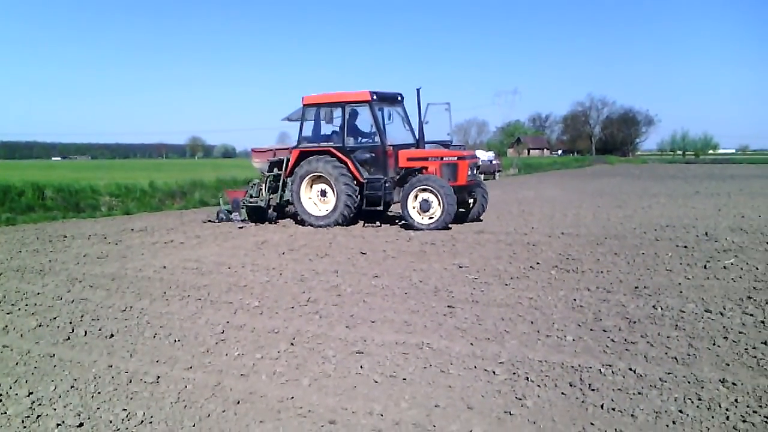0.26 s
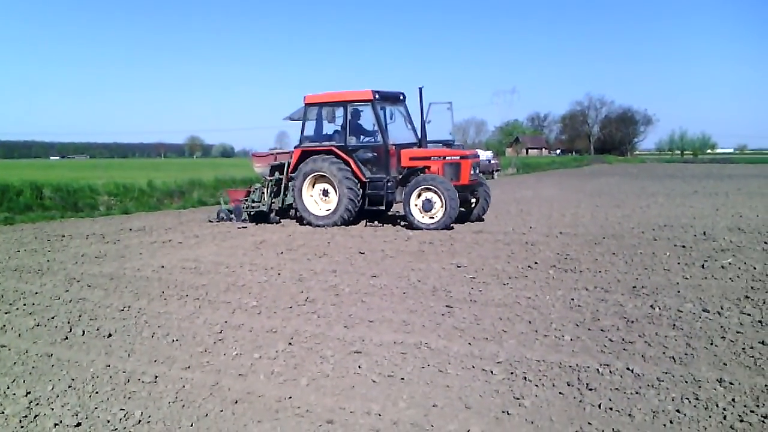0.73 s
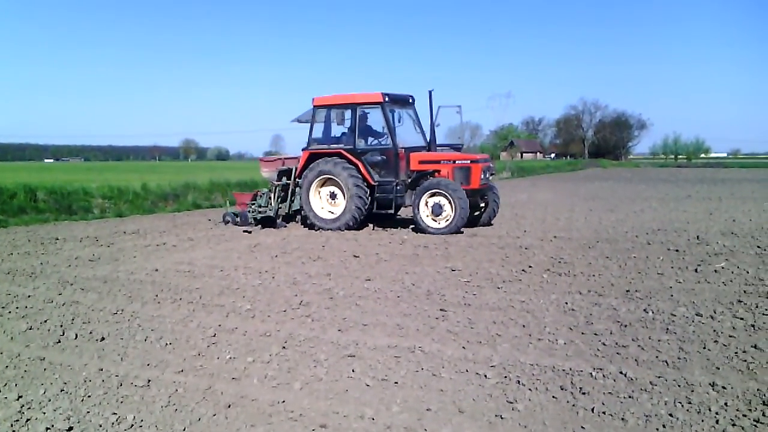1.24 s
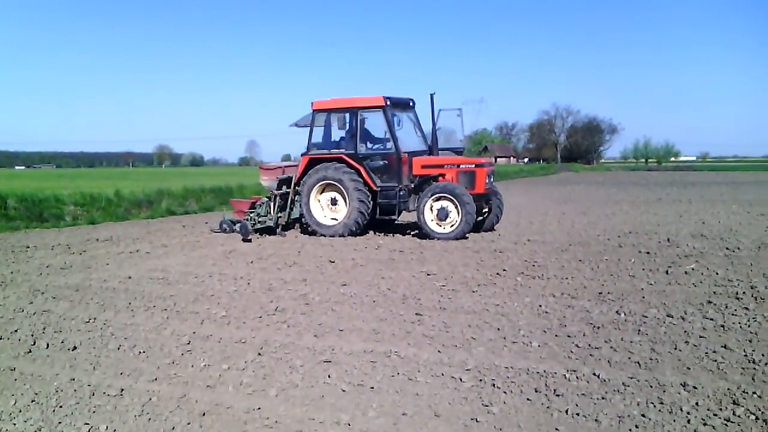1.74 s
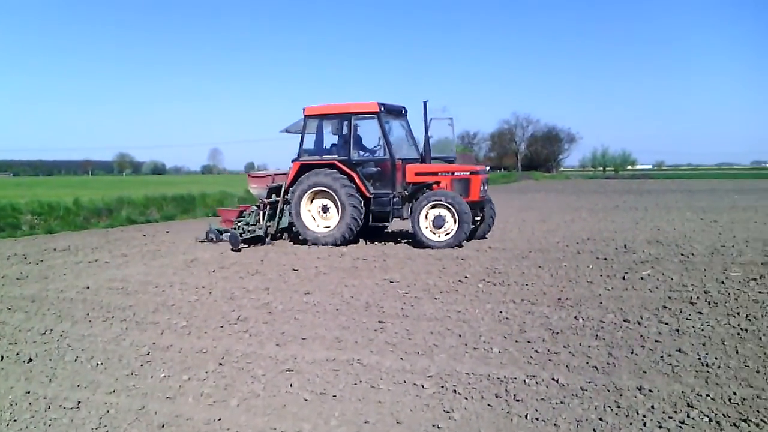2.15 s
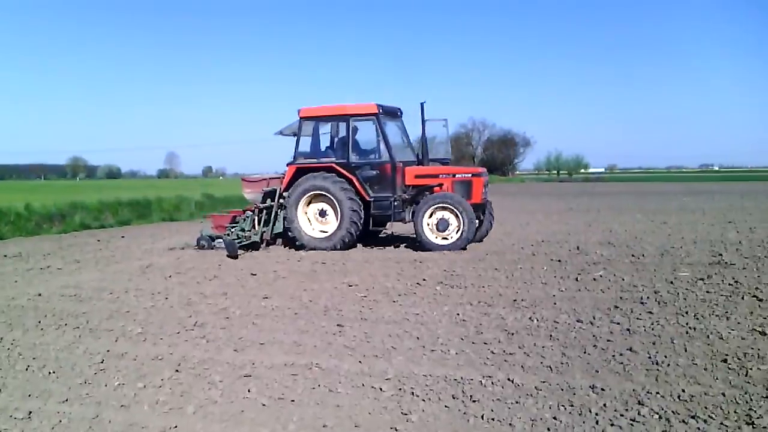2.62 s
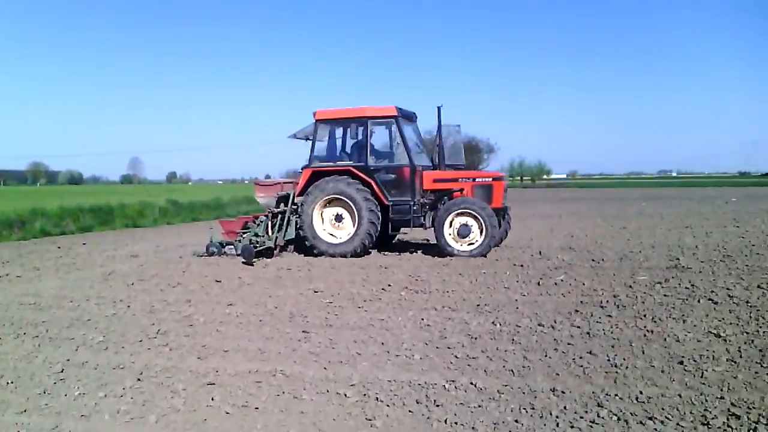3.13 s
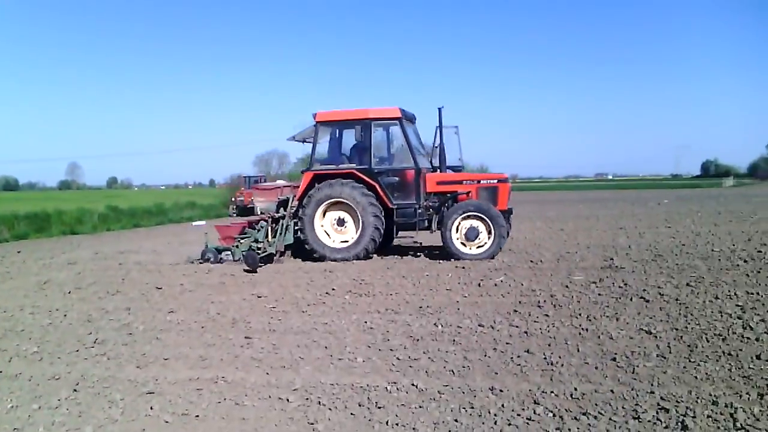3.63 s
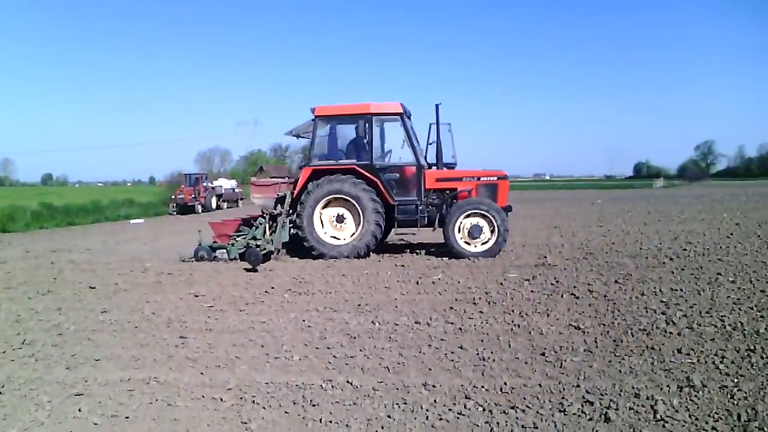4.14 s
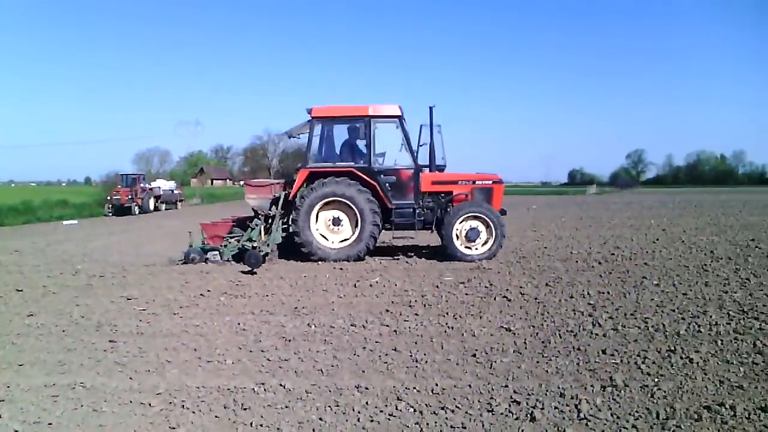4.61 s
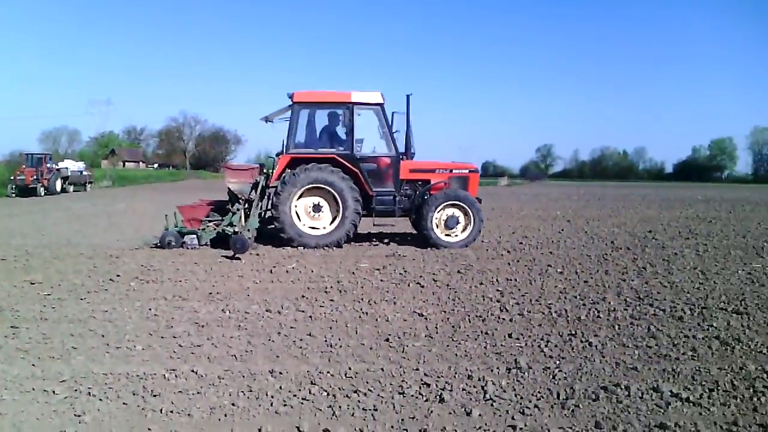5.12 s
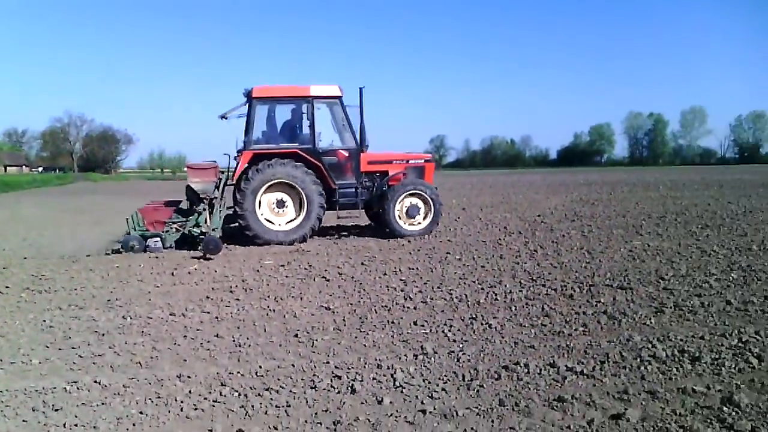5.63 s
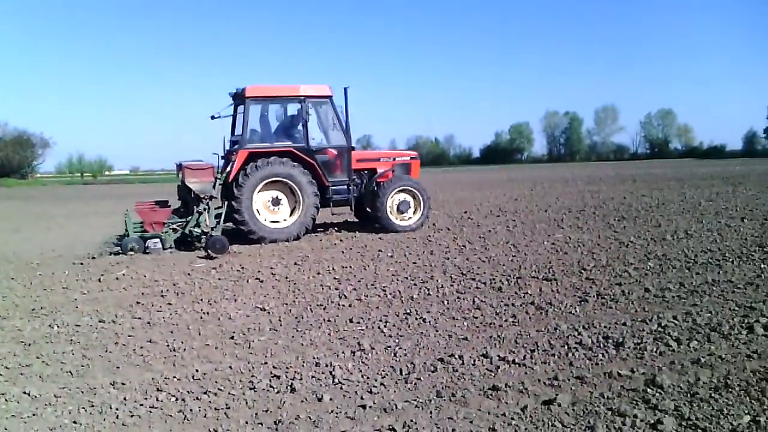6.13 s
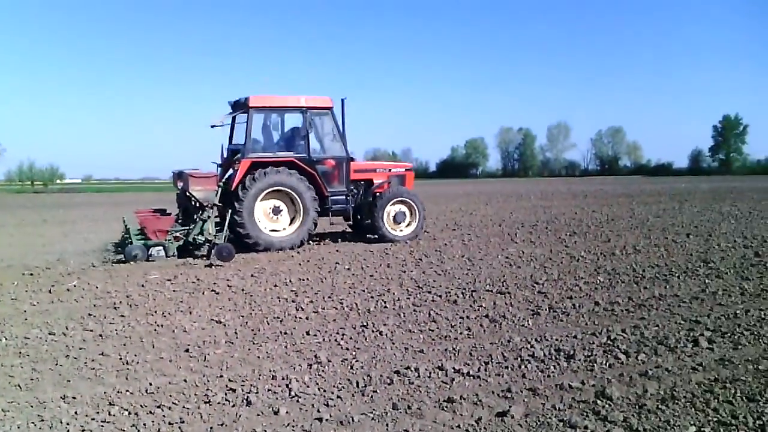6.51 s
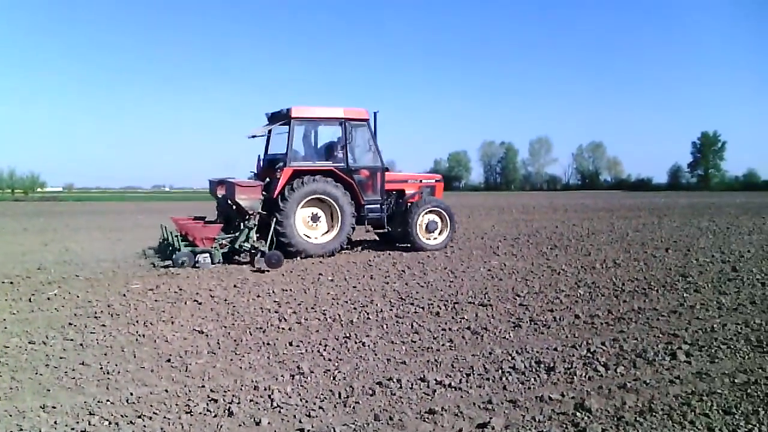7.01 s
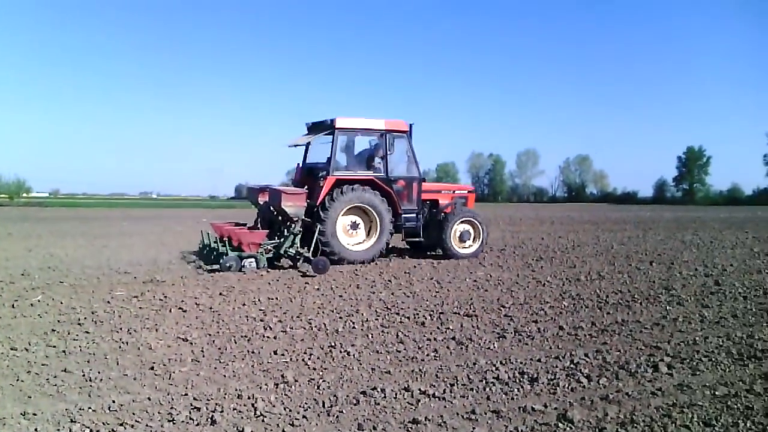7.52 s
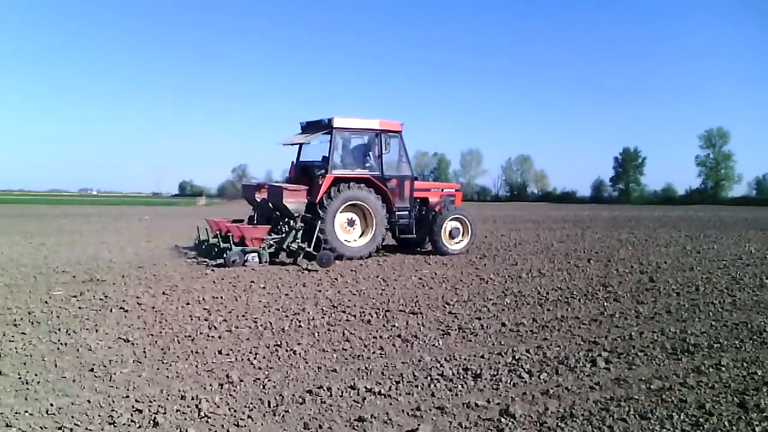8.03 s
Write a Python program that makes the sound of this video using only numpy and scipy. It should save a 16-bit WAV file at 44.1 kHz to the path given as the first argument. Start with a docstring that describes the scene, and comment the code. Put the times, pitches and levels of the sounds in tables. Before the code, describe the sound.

A diesel tractor clatters past in an open field, sagging then revving up, while its towed planter squeaks, scrapes and clinks over dry clods.

```python
"""Tractor pulling a planter

A four-cylinder diesel tractor passes in an open field; its engine sags, then picks up speed.
The engine is tones at multiples of its firing rate, plus noise that swells at each firing.
Early on, while it runs slowly, a loose part buzzes and chirps at the pace of the firings.
The planter's steel scrapes, squeaks and clinks over clods, as ringing modes; a disc rubs once a turn.
Short dry cracks rattle, the frame clunks, a thin whine glides, and there is one low thump."""
import sys
import numpy as np
from scipy import signal
from scipy.fft import rfft, irfft
from scipy.io import wavfile
from scipy.ndimage import uniform_filter1d, map_coordinates

SR = 44100
rng = np.random.default_rng(int(sys.argv[2]) if len(sys.argv) > 2 else 0)


def wav_out(sig):
    """Save sig, one row per channel (or a flat mono array), as 16-bit PCM at SR to the path in sys.argv[1]."""
    wavfile.write(sys.argv[1], SR, np.round(np.clip(np.atleast_2d(sig).T, -1, 1) * 32767).astype(np.int16))


N = 364266
TIME = np.arange(N) / SR


# the engine: (time [s], firing rate [Hz], level of the note at twice that rate [dB])
ENGINE = [(0.0, 39.2, -55.5), (0.27, 38.46, -57.5), (0.62, 39.73, -55), (0.9, 37.66, -56),
          (1.29, 33.45, -52), (1.59, 32.64, -58), (1.82, 33.02, -55), (2.05, 34.84, -54.5),
          (2.53, 41.47, -50), (2.76, 46.2, -41.5), (2.85, 46.56, -48.5), (3.47, 48.6, -49.5),
          (3.73, 49.6, -47.5), (3.91, 49.18, -48.5), (4.55, 51.57, -48), (5.47, 50.58, -48.5),
          (5.73, 51.63, -49), (5.86, 50.48, -50), (6.88, 47.1, -56), (7.45, 47.72, -54.5),
          (8.17, 50.12, -50), (8.26, 51.8, -48)]
# wavering tones of the uneven cylinders: (multiple of the firing rate, relative level [dB])
UNEVEN_ORDERS = [(1.5, -12), (1.75, -8), (2.25, -5), (2.5, -7), (2.75, -7.5), (3.25, -7), (3.5, -8),
                 (3.75, -3), (4.25, -9), (4.5, -4.5), (4.75, -6), (5.5, -20), (5.75, -18.5), (6.5, -17.5)]
# steadier tones at whole multiples: (multiple of the firing rate, relative level [dB])
WHOLE_ORDERS = [(4, -2), (5, -4), (6, -11), (7, -13), (8, -18), (9, -20), (10, -23)]
# how the pipe's tones grow; the columns of every such law are listed above strength()
PIPE_LAW = (-56, 3, 0.03, -2, 1.5)


def exhaust(firings, first_db=-11, first_rear_db=8, uneven_db=-2.0, uneven_speed_db=11,
            whole_db=-1.0, whole_speed_db=-3):
    """Tones at multiples of the firing rate; uneven cylinders add in-between ones that grow with speed."""
    def tone(order, waver):
        turning = np.exp(2j * np.pi * (order * firings + rng.random()))
        return unit(((1 + waver * wander(N, 12.4)) * turning).real)

    def lift_db(order, pipe_hz=170, width_hz=11.7, peak_db=2):
        # the exhaust pipe lifts a tone that passes through its resonance
        return peak_db / (1 + ((order * curve(ENGINE) - pipe_hz) / width_hz) ** 2)

    note = amp(curve(ENGINE, axis=2))
    pipe = strength(PIPE_LAW)
    doublings = np.log2(curve(ENGINE) / WORKING_HZ)
    # the lowest tone grows as the tractor turns its rear to the listener
    drone = note * amp(first_db + first_rear_db * view()[1]) * tone(order=1, waver=.15)
    drone += note * tone(order=2, waver=0.18) + pipe * tone(order=3, waver=1 / 3)
    whole = sum(amp(db + lift_db(order)) * tone(order, .25) for order, db in WHOLE_ORDERS)
    uneven = sum(amp(db) * tone(order, .5) for order, db in UNEVEN_ORDERS)
    whole_gain = amp(whole_db + whole_speed_db * doublings)
    uneven_gain = amp(uneven_db + uneven_speed_db * doublings)
    return drone + pipe * (whole_gain * whole + uneven_gain * uneven)


# noise colours, before their laws: (frequency [Hz], left density [dB per Hz], right density [dB per Hz])
RUMBLE = [(12, -97, -97), (30, -95, -95), (59.6, -84, -92), (120, -82.5, -79.5), (198, -73, -74.5),
          (256, -79, -74.5), (317, -82, -84.5), (430, -88, -86), (606, -105, -105)]
CLATTER = [(405, -105, -105), (498, -91, -89.5), (580, -80, -81), (760, -80, -79), (1210, -80.5, -80.5),
           (1430, -90.5, -82.5), (1570, -80.5, -80.5), (2110, -88, -82), (2940, -87.5, -99.5),
           (2900, -88, -85.5), (3900, -110, -110)]
HISS = [(2870, -112, -112), (3575, -86.5, -85), (4670, -92.5, -83.5), (5220, -100, -79.5),
        (6070, -88.5, -88.5), (7220, -77, -85.5), (7430, -74, -85), (8050, -75.5, -101), (9320, -88, -112),
        (10750, -102, -121), (10550, -115, -121), (13400, -115, -115), (15400, -124, -130)]
FIZZ = [(10900, -111, -115), (13000, -110, -109), (15200, -119, -126)]
# how each noise grows: columns as listed above strength()
RUMBLE_LAW = (0.18, 1.8, 0.053, 3.3, 2.34)
CLATTER_LAW = (0.12, 0.75, 0.063, 0.88, 1.6)
HISS_LAW = (0.14, 7.6, 0.07, 3.75, 0.067)
FIZZ_LAW = (3, 13, -0.12, -10, 1.5)


def engine_noise(firings, waver_db=0.68):
    """Exhaust rumble, combustion clatter, hiss and a fizz from the front, beating with the firings."""
    def level(law):
        return strength(law) * amp(waver_db * wander(N, 0.73).real)
    rumble = noise(RUMBLE) * level(RUMBLE_LAW)
    rumble *= puffs(firings, depth=0.78, decay=0.29, uneven=0.58, delay=0.067)
    clatter = noise(CLATTER) * level(CLATTER_LAW)
    clatter *= puffs(firings, depth=0.81, decay=0.79, uneven=0.31, delay=0.312)
    hiss = noise(HISS) * level(HISS_LAW) + noise(FIZZ) * level(FIZZ_LAW)
    hiss *= puffs(firings, depth=0.46, decay=0.62, uneven=0.6, delay=0.25)
    return rumble + clatter + hiss


def puffs(firings, depth, decay, uneven, delay):
    """A burst of gain at each firing; the four cylinders differ, and chance varies every burst."""
    count = np.floor(firings + delay).astype(int)
    phase = (firings + delay) % 1
    swing = np.array([-0.12, 0.095, 0.0039, 0.25])[count % 4] + rng.standard_normal(512)[count]
    size = 1 + uneven * np.tanh(swing)
    burst = unit(size * (1 - np.exp(-phase / 0.096)) * np.exp(-phase / decay))
    return np.sqrt(1 - depth + depth * burst ** 2)


# an engine law: (level at working speed [dB], growth per doubling of speed [dB],
#   growth per acceleration [dB per Hz/s], extra from behind [dB], share of the distance loss)
WORKING_HZ = 50  # firing rate at working speed


def strength(law):
    """Gain of an engine sound from its speed, its acceleration and the tractor's place."""
    db, speed_db, pull_db, rear_db, loss_share = law
    hz = curve(ENGINE)
    loss_db, rear = view()
    pull = uniform_filter1d(np.gradient(hz) * SR, size=SR // 4)
    level_db = db + speed_db * np.log2(hz / WORKING_HZ) + pull_db * pull
    return amp(level_db + rear_db * rear + loss_share * loss_db)


def view(nearest_s=5.26, distance_m=9.8, speed_m_per_s=2.07):
    """Straight drive past: level change with distance [dB], and the side seen, -1 front to 1 rear."""
    along = speed_m_per_s * (TIME - nearest_s)
    distance = np.hypot(along, distance_m)
    return 20 * np.log10(distance_m / distance), along / distance


def passing(sound):
    """Extra path to the right ear delays it, by half a sample at first and four samples at the end."""
    at = np.arange(N) - np.linspace(.5, 4, N)
    return np.array([sound[0], map_coordinates(sound[1], [at], order=3, mode="nearest")])


# runs of chirps at the firing pace: (time [s], length [s], relative level [dB])
CHIRP_RUNS = [(0.036, 0.06, -31.5), (0.114, 0.06, -29.5), (0.192, 0.09, -31), (0.321, 0.064, -32),
              (0.448, 0.038, -32.5), (0.526, 0.02, -38), (0.55, 0.038, -33), (0.676, 0.02, -34)]
# harder kicks: (time [s], then relative level [dB] of the low mode, main mode and high mode)
RATTLES = [(0.628, -28, -43, -38.5), (0.652, -38, -34, -46), (0.705, -40, -40, -36), (0.731, -38, -48, -38),
           (0.755, -38, -44, -48), (0.78, -37, -39, -55)]


def chirps(main_hz=6600, low_hz=5000, high_hz=8100, rise_s=0.0028, hold_s=0.0034, decay_s=0.0054,
           scatter_db=0.7, scatter_hz=70):
    """A kicked loose part rings for a few milliseconds; hard kicks also wake its outer modes."""
    out, t = np.zeros((2, N)), np.arange(2048) / SR
    shape = np.sin(np.pi / 2 * np.minimum(t / rise_s, 1)) * np.exp(-np.maximum(t - hold_s, 0) / decay_s)
    rate = curve(ENGINE)[TIME < CHIRP_RUNS[-1][0]].mean()  # average firing rate over the runs
    for start, length, db in CHIRP_RUNS:
        for s in np.arange(start, start + length, 1 / rate):
            loud, pitch = rng.standard_normal(2)
            main = ring(len(t), main_hz + scatter_hz * pitch, 260, 1.1, steadiness=0.39, glide=-0.059)
            add(out, s, amp(db - 6 + scatter_db * loud) * shape * main)
    for s, low_db, main_db, high_db in RATTLES:
        low = amp(low_db) * ring(len(t), low_hz, 260, -16, steadiness=1.0, glide=-0.027)
        main = amp(main_db) * ring(len(t), main_hz, 530, 1.2, steadiness=1.0, glide=-0.025)
        high = amp(high_db) * ring(len(t), high_hz, 130, 14, steadiness=0.89)
        add(out, s, shape * (low + main + high))
    return out


# the loose part buzzing on its seat: (time [s], relative level [dB])
BUZZ = [(0, -87), (0.14, -52), (0.3, -65), (0.45, -56), (0.58, -58.5), (0.65, -50), (0.8, -61), (0.9, -65),
        (1.05, -85), (1.3, -120)]
# resonances of the seat: (frequency [Hz], width [Hz], relative level [dB], left minus right [dB])
SEAT = [(3450, 180, -15, -14), (4270, 240, -1, -11), (5050, 230, -5.5, -15), (5700, 150, -0.5, -21)]


def buzz(firings):
    """The loose part also chatters roughly on its seat, in time with the firings."""
    rough = bank(SEAT, BUZZ, apart=0.86, steadiness=0.24) * flutter(N, 30, depth=0.95)
    return rough * puffs(firings, depth=0.87, decay=0.83, uneven=0.6, delay=0.33)


# sharp knocks of steel on steel: (time [s], length [s], attack [s], body level [dB],
#   top modes against the body [dB], squeak level [dB], squeak pitch [Hz],
#   slipping joint level [dB], joint pitch [Hz], crack level [dB]); levels are relative
KNOCKS = [(1.676, 0.015, 0.0054, -62, 7, -44, 5450, -34, 3820, -43.5),
          (3.593, 0.035, 0.012, -63, 11, -29.5, 5560, -69, 4600, -54),
          (3.739, 0.045, 0.014, -45, -25, -24, 5560, -38.5, 4004, -65),
          (3.94, 0.032, 0.01, -58, 14, -28, 5560, -67, 4074, -55),
          (4.246, 0.034, 0.005, -36.5, -5, -23, 5500, -35.5, 3920, -54),
          (4.482, 0.033, 0.0097, -46, -1, -31, 5440, -43, 3900, -61),
          (4.544, 0.037, 0.0067, -54, 5, -32, 5510, -62, 4500, -65),
          (4.969, 0.039, 0.011, -37.5, -4, -26, 5550, -45, 4000, -52),
          (5.967, 0.053, 0.0041, -45, 11, -37, 5530, -69, 4270, -48),
          (6.492, 0.044, 0.011, -45, -14, -39.5, 5540, -56, 4400, -47),
          (6.673, 0.05, 0.022, -44, 1.5, -33.5, 5540, -60, 3970, -56),
          (6.835, 0.043, 0.0044, -45, -9, -40, 5550, -73, 4360, -59),
          (7.203, 0.041, 0.0069, -31, -20, -52, 5550, -51, 4534, -53),
          (8.177, 0.048, 0.0068, -38, -18, -39, 5380, -44.5, 4500, -57.5)]
# broad bands of the crack: (frequency [Hz], width [Hz], relative level [dB], left minus right [dB])
CRACK = [(2090, 210, -6, -14), (3220, 330, -5, -7), (4900, 650, 0, -17), (7630, 1300, -0.5, 10)]


def knocks(crack_s=0.022, crack_attack_s=0.003, clang_hz=5380, clang_db=-10):
    """The frame jolts over clods: a short broad crack and ringing steel, strengthened by an added clang."""
    out = np.zeros((2, N))
    for (s, length, attack, body_db, bright_db, squeak_db, squeak_hz,
         joint_db, joint_hz, crack_db) in KNOCKS:
        rise = attack / length
        add(out, s, contact(length, rise, body_db, body_db + bright_db, squeak_db,
                            joint_db, joint_hz, squeak_hz))
        shape = stroke(length, rise, fall=2.5, roundness=2)
        clang = ring(len(shape), clang_hz, 30, -19, steadiness=0.73)
        add(out, s, amp(squeak_db + clang_db) * shape * clang)
        shape = stroke(crack_s, crack_attack_s / crack_s, fall=0.88)
        add(out, s, amp(crack_db) * shape * modes(len(shape), CRACK, steadiness=.1, apart=1.4))
    return out


# softer rubs: (time [s], length [s], body level [dB], top modes level [dB], squeak level [dB],
#   slipping joint level [dB], joint pitch [Hz]); levels are relative
RUBS = [(1.975, 0.073, -69, -60, -46.5, -68, 4040), (3.686, 0.077, -70, -57, -37, -72, 4000),
        (3.777, 0.023, -42.5, -57, -30.5, -57, 4000), (3.85, 0.056, -47, -44, -31, -45, 4480),
        (3.98, 0.042, -60, -56, -39, -56, 3840), (4.015, 0.071, -53, -59, -38, -63, 3847),
        (4.107, 0.04, -57, -52, -31.5, -56, 4480), (4.15, 0.041, -66, -62, -43.5, -70, 3973),
        (4.287, 0.04, -49, -55, -42, -64, 3900), (4.367, 0.051, -40.5, -52, -38, -47, 4000),
        (4.448, 0.055, -50, -44, -38, -65, 4037), (4.616, 0.059, -57, -48, -34, -53, 4460),
        (4.712, 0.043, -50, -53, -47, -56, 4455), (4.791, 0.035, -53, -45, -47.5, -59, 4350),
        (5.068, 0.049, -37.5, -60, -44, -51, 3970), (5.287, 0.044, -45.5, -47, -64, -64, 4400),
        (5.448, 0.069, -68, -48, -37.5, -70, 4423), (5.553, 0.041, -58, -48, -60, -55, 4407),
        (5.731, 0.041, -38.5, -49, -45, -61, 4354), (5.799, 0.044, -58, -44, -62, -52, 4440),
        (5.994, 0.061, -37, -41.5, -48, -47, 4330), (6.061, 0.038, -47, -42.5, -55, -55, 4400),
        (6.144, 0.041, -53, -46.5, -52, -49.5, 4480), (6.232, 0.029, -43, -60, -56, -62, 4400),
        (6.313, 0.029, -50, -44.5, -59, -66, 4400), (6.556, 0.041, -54, -55, -40.5, -64, 4000),
        (6.603, 0.058, -45, -52, -37.5, -48.5, 3937), (7.024, 0.051, -52, -44.5, -34.5, -66, 4426),
        (7.224, 0.035, -53, -51, -40, -53, 4683), (7.452, 0.068, -40.5, -55, -63, -59, 4750),
        (7.522, 0.1, -42.5, -48, -35, -56, 3940), (7.64, 0.047, -49, -54, -41, -56, 3470),
        (7.829, 0.037, -60, -56.5, -46, -70, 4000), (8.202, 0.077, -42, -61, -62, -46, 3830)]
RUB_RISE = 0.48  # share of a rub's length to its peak
JOINT_RANGE_HZ = (3790, 4360)  # range for joint pitches drawn by chance


def rubs(count=12, from_s=4.6, body_db=-54, top_db=-50, squeak_db=-58, joint_db=-66, spread_db=8):
    """Steel parts rub softly: clear rubs at set times, and faint ones scattered over the later part."""
    out = np.zeros((2, N))
    for s, length, *colour in RUBS:
        add(out, s, contact(length, RUB_RISE, *colour))
    for k, (when, *chance) in enumerate(rng.random((count, 4))):
        levels = np.array([body_db, top_db, squeak_db]) + spread_db * (np.array(chance) - .5)
        s = from_s + (TIME[-1] - from_s) * (k + when) / count
        add(out, s, contact(0.022, RUB_RISE, *levels, joint_db, rng.uniform(*JOINT_RANGE_HZ)))
    return out


# turns of a disc: (time [s], length [s], relative squeak level [dB], relative rim level [dB])
DISC_TURNS = [(2.593, 0.066, -42.5, -67), (2.692, 0.037, -39.5, -70), (2.766, 0.09, -37, -69),
              (2.868, 0.076, -33.5, -52.5), (2.959, 0.072, -34.5, -50.5), (3.051, 0.098, -30.5, -45),
              (3.143, 0.037, -52, -55), (3.224, 0.073, -33, -43), (3.317, 0.068, -35, -45.5),
              (3.415, 0.083, -39, -42.5)]
# ringing of its rim: (frequency [Hz], width [Hz], relative level [dB], left minus right [dB])
RIM = [(2644, 89, -1.5, -23), (3500, 35, -4.5, -22), (4100, 61, -6.5, -24), (4140, 90, -12, -22),
       (4800, 80, -10.5, -14)]


def disc(top_db=-20, body_db=-52, joint_db=-75):
    """A turning disc squeaks against its scraper once a turn, and its rim rasps."""
    out = np.zeros((2, N))
    for s, length, squeak_db, rim_db in DISC_TURNS:
        add(out, s, contact(length, RUB_RISE, body_db, squeak_db + top_db, squeak_db, joint_db,
                            rng.uniform(*JOINT_RANGE_HZ)))
        shape = stroke(length, 0.38, fall=1.15)
        add(out, s, amp(rim_db) * shape * modes(len(shape), RIM, steadiness=0.32, apart=1.0))
    return out


# ringing of the planter's steel: (frequency [Hz], width [Hz], relative level [dB], left minus right [dB])
STEEL = [(2565, 20, -7, -8), (2675, 40, -8, 30), (3470, 47.5, -13, -13), (4400, 120, -23, -18),
         (5400, 50, -17, -5.5), (5508, 18, -5, -16), (5556, 14, 0, -30), (6545, 26, -9, -2),
         (6928, 9, -9, 25), (7612, 32, -4, 9), (8565, 26, -10.5, 33), (9400, 40, -23, 35),
         (10860, 76, -38, 23)]
# where those modes change family: low body modes, joint, squeak, top modes
BODY_HZ, JOINT_HZ, SQUEAK_HZ, TOP_HZ = 2600, 4000, 5500, 6300


def contact(length, rise, body_db, top_db, squeak_db, joint_db, joint_hz, squeak_hz=5555):
    """Touching steel locks onto a bending note and a joint note, and wakes its modes as it slips."""
    # sharp knocks die fastest
    shape = stroke(length, rise, fall=0.97 + 0.039 / max(rise, .08), roundness=0.91)
    size, ring_db = len(shape), squeak_db - 6
    sound = amp(squeak_db - 1) * ring(size, squeak_hz, 21.7, -21, steadiness=1.0, glide=-0.006)
    sound += amp(joint_db + 3.5) * ring(size, joint_hz, 55, -15.5, steadiness=0.48, glide=-0.012)
    family_hz = [BODY_HZ, JOINT_HZ, SQUEAK_HZ, (SQUEAK_HZ + TOP_HZ) / 2, TOP_HZ]
    family_db = [body_db, joint_db, ring_db, ring_db, top_db]
    for hz, width, db, side_db in STEEL:
        level_db = np.interp(hz, family_hz, family_db)
        sound += amp(db + level_db) * ring(size, hz, width, side_db, steadiness=0.39, apart=0.99)
    grit_db = np.mean([body_db, joint_db, squeak_db, top_db]) - 14.0
    grit = amp(grit_db) * ring(size, 4200, 1200, -2.0, apart=3.4)
    crunch = amp(body_db - 15.0) * ring(size, 1950, 360, -4.5, apart=0.96)
    return (sound + grit + crunch) * shape * flutter(size, 62, depth=0.29)


# squeals and groans of joints and blade: (nominal time [s], nominal length [s], pitch [Hz],
#   relative level [dB], left minus right [dB], glide [share of the pitch])
SQUEALS = [(0.034, 0.08, 1580, -69, 0, -0.016), (0.099, 0.52, 253.4, -69, -4, -0.005),
           (0.152, 0.03, 3130, -69, -12, 0), (0.278, 0.067, 1580, -62.5, -3, -0.015),
           (0.293, 0.017, 5300, -52.5, -21, -0.041), (0.521, 0.02, 3040, -59.5, -12, 0),
           (0.6, 0.014, 5320, -48, -16, 0), (0.632, 0.063, 1593, -55, -1, -0.018),
           (0.634, 0.023, 4900, -45.5, -19, -0.069), (0.713, 0.035, 4870, -50, -16, -0.11),
           (0.771, 0.098, 5190, -49, -31, -0.06), (0.839, 0.025, 4200, -54, -18, -0.0018),
           (0.875, 0.045, 5300, -58, -24, 0.02), (0.89, 0.04, 1580, -64, -5, 0.033),
           (0.91, 0.065, 5410, -53.5, -25, -0.0041), (1.1, 0.05, 1623, -60.5, -1, 0),
           (1.599, 0.04, 1600, -64, -3, 0), (1, 0.06, 1566, -55, -2, -0.016),
           (1.468, 0.044, 1593, -55.5, -1, -0.025), (1.687, 0.006, 4600, -40, -17, 0),
           (1.693, 0.031, 4480, -51.5, -14, -0.032), (1.695, 0.019, 3870, -48, -9, -0.0085),
           (1.69, 0.043, 5360, -54, -26, -0.008), (1.783, 0.016, 4250, -56, -16, -0.02),
           (2.081, 0.043, 3860, -53.5, -23, -0.013), (2.513, 0.1, 1427, -52, -14, -0.021),
           (2.517, 0.029, 5330, -50, -15, -0.0022), (2.566, 0.06, 2760, -58.5, -10, -0.01),
           (2.617, 0.046, 3980, -50.5, -18, 0.05), (2.665, 0.031, 2740, -56, -9, -0.04),
           (2.767, 0.054, 2140, -50, -11, 0.0037), (2.898, 0.048, 4090, -55, -32, -0.066),
           (2.91, 0.022, 12400, -68, 0, -0.013), (2.96, 0.026, 2740, -50, -20, 0.02),
           (3.029, 0.054, 2155, -45.5, -27, 0.028), (3.08, 0.11, 4920, -53, -25, -0.038),
           (3.1, 0.079, 2780, -55.5, -23, 0.04), (3.172, 0.086, 2064, -49, -27, 0.05),
           (3.29, 0.05, 2175, -47, -27, 0.02), (3.332, 0.06, 1950, -52.5, -18, -0.048),
           (3.332, 0.032, 3400, -49, -14, 0), (3.405, 0.04, 2750, -49, -14, 0.055),
           (3.862, 0.023, 7620, -45.5, 10, 0.01), (4.115, 0.029, 8670, -57, 16, 0),
           (4.299, 0.045, 569, -60, 4, -0.028), (4.335, 0.028, 6340, -57, -6, 0),
           (4.375, 0.04, 4850, -53.5, -14, 0), (4.411, 0.044, 2080, -52, -4, -0.023),
           (4.505, 0.072, 4470, -51, -7, 0.0057), (4.535, 0.017, 8650, -54, 20, -0.02),
           (4.929, 0.097, 574, -59.5, 1, 0.0097), (5.268, 0.051, 2114, -49.5, -11, -0.014),
           (5.559, 0.026, 9450, -58, 20, 0), (5.728, 0.031, 6490, -55, -4, 0.006),
           (6.001, 0.042, 2686, -55, -8, 0.0051), (6.143, 0.03, 3460, -55, -4, -0.014),
           (6.339, 0.03, 3480, -55.5, -16, -0.018), (6.426, 0.024, 3298, -58, -10, -0.0033),
           (6.66, 0.074, 3970, -49.5, -29, -0.0096), (6.668, 0.03, 2140, -46, -25, 0.02),
           (6.876, 0.15, 560, -51, -5, -0.0015), (7.051, 0.026, 4930, -44.5, -29, 0.051),
           (7.248, 0.035, 4667, -51, -22, -0.0067), (7.321, 0.065, 2870, -60, -3, -0.019),
           (7.525, 0.13, 1642, -57.5, 3, 0.019), (7.531, 0.037, 3905, -48, -19, -0.0025),
           (7.654, 0.03, 2906, -56, -10, 0), (7.71, 0.027, 580, -55.5, 1, 0),
           (7.769, 0.029, 3880, -54.5, -20, -0.0095), (7.835, 0.018, 8610, -53.5, 22, 0),
           (8.163, 0.11, 585.4, -55, 4, -0.032)]


def squeals(width_hz=6.1, width_share=0.018):
    """Friction makes joints and blade squeal or groan, some sliding in pitch; higher notes are broader."""
    out = np.zeros((2, N))
    for s, length, hz, db, side_db, glide in SQUEALS:
        size = int(1.34 * length * SR)  # room for the soft ends
        width = width_hz + width_share * hz
        shape = unit(signal.windows.tukey(size, .6))
        note = ring(size, hz, width, side_db, steadiness=0.53, glide=glide)
        add(out, s - 0.092 * length, amp(db + 5.5) * shape * note)
    return out


# jiggling of the planter's small parts: (time [s], relative level [dB])
JIGGLE = [(0, -76), (1.8, -60), (2.4, -58.5), (2.9, -52.5), (3.5, -51), (4.5, -69), (5.3, -64),
          (6.001, -50), (7, -54.5), (8.26, -56.5)]
# a blade dragging through the soil: (time [s], relative level [dB])
DRAG = [(2.38, -70), (2.49, -49), (2.62, -46.5), (2.74, -51), (2.8, -40), (2.87, -51), (2.98, -48),
        (3.07, -41), (3.13, -47), (3.33, -48.5), (3.48, -46.5), (3.6, -54)]
# hum of three tones, rising from silence: (time [s], relative level [dB])
HUM = [(0, -104), (3.5, -56.5), (4.8, -48.5), (5.6, -57), (6.5, -62.5), (7.4, -47.5), (8.26, -48)]
# modes of the blade, and the tones of the hum: (frequency [Hz], width [Hz], relative level [dB], left minus
# right [dB])
BLADE = [(1385, 100, -5, -10.5), (1978, 74, -9, -6), (2160, 170, -2.5, -10), (2776, 150, -10.5, -24)]
HUM_TONES = [(568.5, 24, -11, 5.2), (1540, 33, -11.5, 16), (2060, 30, -12, 7.6)]


def planter(tilt_db=7.0, squeak_db=-5):
    """Small parts jiggle the steel's high modes, a blade drags in jerks, joints creak and a hum swells in."""
    tinkle = []
    for hz, width, db, side_db in STEEL:
        db = db + tilt_db * np.log2(hz / SQUEAK_HZ) + squeak_db * (JOINT_HZ < hz < TOP_HZ)
        tinkle.append((hz, width, db, side_db))
    jolts = flutter(N, 8.4, depth=0.95)
    jiggle = bank(tinkle, JIGGLE, apart=1.0, steadiness=0.091) * jolts
    drag = amp(-2.0) * bank(BLADE, DRAG, apart=0.57, steadiness=0.13) * flutter(N, 70, depth=0.75)
    return jiggle + drag + creaks() + bank(HUM_TONES, HUM, apart=0.12, steadiness=0.12)


def creaks(count=60, db=-58, from_s=2.4):
    """Faint gliding creaks of small joints, from the moment the planter picks up speed."""
    out = np.zeros((2, N))
    for when, pitch, span, loud, bend, side in rng.random((count, 6)):
        s = from_s + (TIME[-1] - from_s) * when ** 1.3
        shape = stroke(0.027 + 0.16 * span, 0.13)
        hz = np.interp(pitch, [0, .45, .5, 1], [1700, 2730, 3500, 5100])
        sound = ring(len(shape), hz, 42, -8 + 14 * (side - .5), steadiness=0.75, glide=0.086 * (bend - .6))
        add(out, s, amp(db + 7 * (loud - .5)) * shape * sound)
    return out


# short dry cracks and rattles of the planter, at the blade and later with its knocks:
#   (time [s], pitch [Hz], level [dB])
DRY_CRACKS = [(2.508, 2380, -40.5), (2.506, 1400, -42), (2.601, 1335, -38), (2.604, 2480, -40),
              (2.629, 840, -41), (2.694, 2510, -42), (2.709, 2100, -45), (2.834, 1550, -46),
              (3.057, 2200, -37), (3.332, 2000, -40), (6.498, 1800, -42), (6.576, 1000, -46),
              (6.675, 2200, -41), (6.837, 2200, -43), (7.213, 1910, -43), (7.552, 1651, -45),
              (7.573, 1660, -44)]


def dry_cracks(length=0.007, width_hz=170):
    """Short dry cracks and rattles of the planter: each is one brief burst around its pitch."""
    out, shape = np.zeros((2, N)), stroke(length, 0.3, fall=1.2)
    for s, hz, db in DRY_CRACKS:
        add(out, s, amp(db) * shape * ring(len(shape), hz, width_hz, -10, steadiness=0.64, apart=0.4))
    return out


def scrapes(count, from_s, to_s, db, low_hz, high_hz, bend=0.049):
    """Short gritty gliding scrapes, each at a pitch drawn by chance."""
    out = np.zeros((2, N))
    for k, (when, pitch, span, loud, glide) in enumerate(rng.random((count, 5))):
        shape = stroke(0.017 + 0.032 * span, 0.61, fall=1.7)
        hz = low_hz + (high_hz - low_hz) * np.sqrt(pitch)
        sound = ring(len(shape), hz, 35, -1, steadiness=0.97, apart=0.36, glide=bend * (glide - .5))
        s = from_s + (to_s - from_s) * (k + when) / count
        add(out, s, amp(db + 6.0 * (loud - .5)) * shape * sound)
    return out


# dull clunks of the frame: (time [s], length [s], pitch [Hz], width [Hz], level [dB])
CLUNKS = [(1.316, 0.08, 1036, 78, -56), (1.76, 0.042, 130, 14, -62), (1.823, 0.051, 736, 70, -51),
          (2.186, 0.088, 219.4, 38, -50), (2.335, 0.072, 194.7, 27, -49), (3.778, 0.044, 575, 25.5, -52.5)]


def clunks():
    """The frame drops over clods with a short dull note."""
    out = np.zeros((2, N))
    for s, length, hz, width, db in CLUNKS:
        shape = stroke(length, 0.12, fall=1.9)
        add(out, s, amp(db) * shape * ring(len(shape), hz, width, 0, steadiness=0.6, apart=0.16))
    return out


def thump(at_s=2.715, length_s=0.067, hz=88, db=-45):
    """One dull low thump, made of two low notes that swell and die together."""
    out, shape = np.zeros((2, N)), stroke(length_s, 0.72, fall=1.7)
    note = ring(len(shape), hz, 12, 0, steadiness=0.93, apart=0.047)
    deep = ring(len(shape), 45, 30, 0, steadiness=.9, apart=.05)
    add(out, at_s, amp(db) * shape * (note + deep))
    return out


# a faint whine, perhaps the planter's fan: (time [s], pitch [Hz], level [dB], level an octave below [dB])
WHINE = [(2.5, 855, -68, -90), (3.5, 895, -63.5, -88), (4.7, 980.6, -60.5, -74), (5.4, 1049, -66, -63.5),
         (5.75, 1086, -61, -58.5), (5.95, 1111, -58, -62), (6.5, 1143, -63, -65), (7.2, 1109, -59.5, -61.5),
         (8.26, 1142, -62, -66)]


def whine():
    """A thin tone and its lower octave, mostly climbing as the planter gets going."""
    low = amp(curve(WHINE, axis=3)) * ring(N, curve(WHINE) / 2, 3.5, 4, steadiness=0.5, apart=.15)
    return low + amp(curve(WHINE, axis=2)) * ring(N, curve(WHINE), 3, -1, steadiness=0.85, apart=.15)


# likeness of the two ears: (frequency [Hz], share that is alike [0 to 1])
SAME = [(60, .84), (250, .9), (500, .92), (1100, .93), (1800, .88), (2600, .6), (4000, .35), (8000, .3),
        (14000, .5)]


def noise(rows):
    """Stereo noise of a given spectrum, mostly alike in both ears in the bass."""
    hz = np.fft.rfftfreq(N, 1 / SR)
    a, b = rfft(rng.standard_normal((2, N)))
    same = spectrum(SAME, hz)
    left = a * amp(spectrum(rows, hz, axis=1))
    right = (same * a + np.sqrt(1 - same ** 2) * b) * amp(spectrum(rows, hz, axis=2))
    # fade out beyond both ends of the table
    skirts = 1 / (1 + (hz / rows[-1][0]) ** 16) / (1 + (rows[0][0] / (hz + 1)) ** 8)
    return irfft(np.array([left, right]) * skirts, N) * np.sqrt(SR / 2)


def ring(size, hz, width, balance_db, steadiness=0., apart=1.0, glide=0.):
    """A rubbed mode; steadiness evens its level as friction locks onto it, glide bends its pitch."""
    bend = 1 + glide * (np.linspace(0, 1, size) - 1 / 4)
    carrier = np.exp(2j * np.pi * np.cumsum(hz * bend) / SR)
    z = wander(size, width)
    z = unit(z / np.hypot(abs(z), .3) ** steadiness)
    ears = np.array([z + apart * wander(size, width), z])  # apart: how much the left ear differs
    return pan(balance_db) * unit((ears * carrier).real)


def modes(size, table, steadiness, apart):
    """All the modes of one table, ringing together."""
    return sum(amp(db) * ring(size, hz, width, side_db, steadiness, apart)
               for hz, width, db, side_db in table)


def bank(table, level, apart, steadiness):
    """Modes kept ringing by steady shaking, under one level curve."""
    return amp(curve(level)) * modes(N, table, steadiness, apart)


def stroke(length, rise, fall=3.0, roundness=1):
    """A rub's envelope swells to a peak, then dies by twice its length; roundness softens the start."""
    u = np.arange(int(2 * length * SR)) / (length * SR)
    swell = np.sin(np.pi / 2 * np.minimum(u / rise, 1)) ** roundness
    shape = swell * np.exp(-fall * np.maximum(u - rise, 0) / (1 - rise))
    return unit(shape * np.minimum(2 * (2 - u), 1)) / np.sqrt(2)


def flutter(size, hz, depth):
    """Uneven chatter of a slipping contact: a bounded gain of rms 1."""
    return unit(1 + depth * np.tanh(2 * wander(size, hz).real))


def wander(size, width):
    """Slow complex chance, with the spectrum of a resonance of this width shifted to zero."""
    hz = np.fft.fftfreq(size // 16 + 512, 16 / SR)  # one value every 16 samples
    chance = np.fft.fft(rng.standard_normal((len(hz), 2)) @ [1, 1j])
    z = np.fft.ifft(chance / (1 + (hz / width) ** 2))
    return unit(np.interp(np.arange(size) / 16, np.arange(len(hz)), z))


def amp(db):
    """Decibels to gain."""
    return 10 ** (np.asarray(db) / 20)


def unit(x):
    """Scales to rms 1."""
    return x / np.sqrt(np.mean(abs(x) ** 2) + 1e-20)


def pan(db):
    """Left and right gains of mean power 1."""
    return unit(amp([[db / 2], [-db / 2]]))


def curve(rows, axis=1):
    """One column of a table, joined by straight lines in time."""
    rows = np.array(rows, float)
    return np.interp(TIME, rows[:, 0], rows[:, axis])


def spectrum(rows, hz, axis=1):
    """One column of a table on a log-frequency axis."""
    rows = np.array(rows, float)
    return np.interp(np.log(hz + 1), np.log(rows[:, 0] + 1), rows[:, axis])


def add(mix, s, sound):
    """Mixes a stereo sound in at time s."""
    part = mix[:, max(round(s * SR), 0):][:, :sound.shape[1]]
    part += sound[:, :part.shape[1]]


def scene():
    """Engine and planter in the open, with no echo."""
    firings = np.cumsum(curve(ENGINE)) / SR  # running count of firings
    tractor = passing(exhaust(firings) + engine_noise(firings))
    loose_part = buzz(firings) + chirps()
    steel = knocks() + rubs() + disc() + squeals() + planter()
    # gritty scrapes during the blade's drag, and again faintly near the end
    grit = scrapes(count=20, from_s=2.47, to_s=3.8, db=-56, low_hz=1407, high_hz=2837)
    grit += scrapes(count=12, from_s=6.9, to_s=8.4, db=-63.5, low_hz=1300, high_hz=2420)
    return tractor + loose_part + steel + dry_cracks() + grit + clunks() + thump() + whine()


def record(dry, edge_hz=15040):
    """A steep low-pass filter takes away the sound above its edge."""
    lowpass = signal.firwin(511, edge_hz, window=("kaiser", 9), fs=SR)
    return signal.oaconvolve(dry, lowpass[None], "same")


dry = scene()
out = record(dry)
wav_out(out)
```